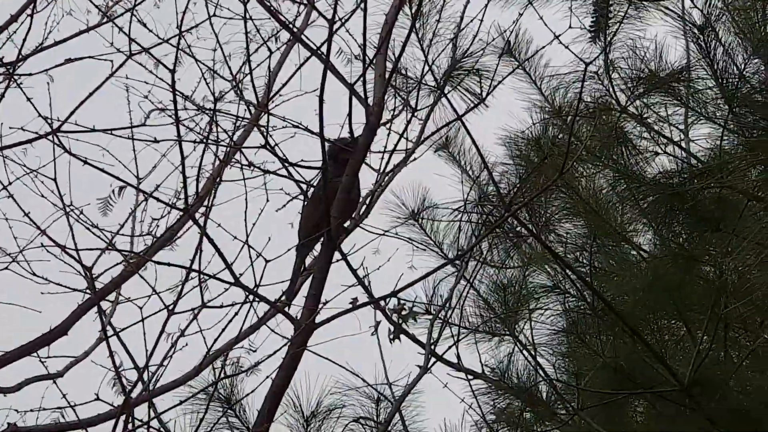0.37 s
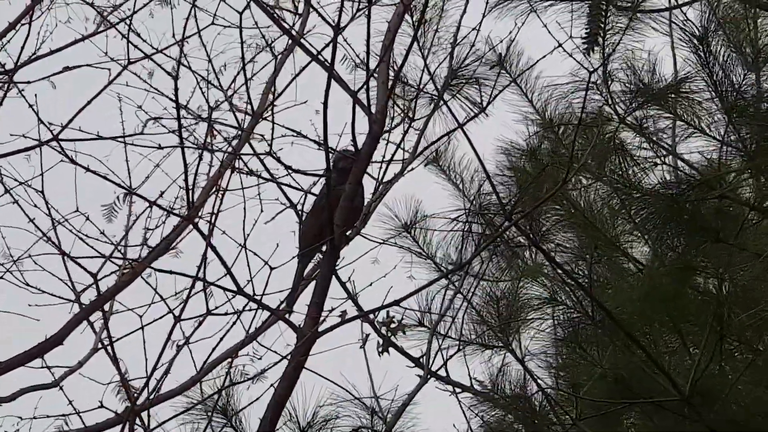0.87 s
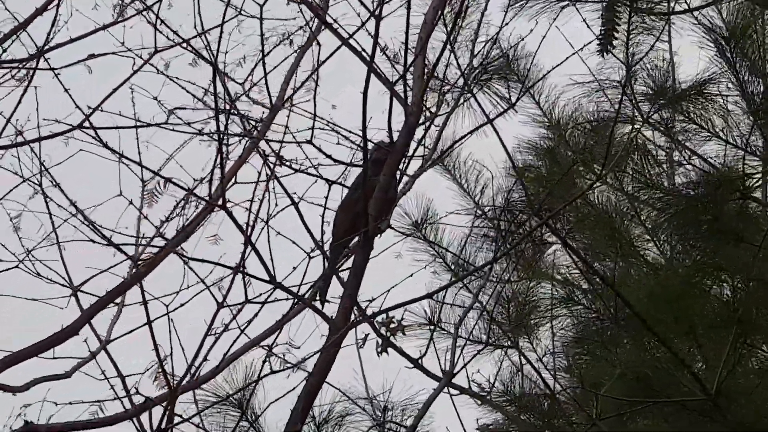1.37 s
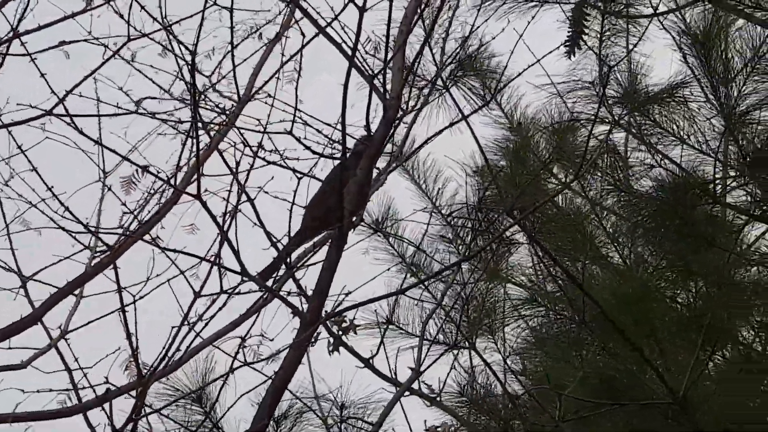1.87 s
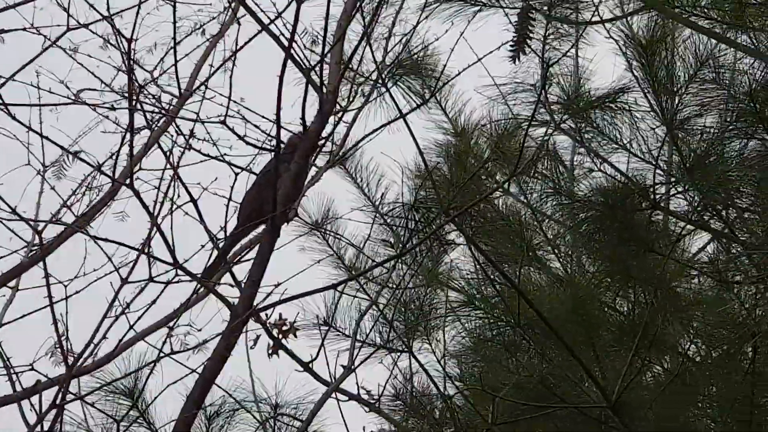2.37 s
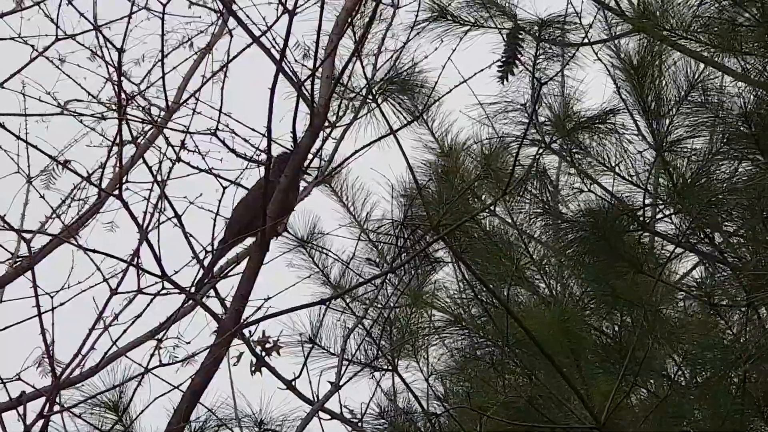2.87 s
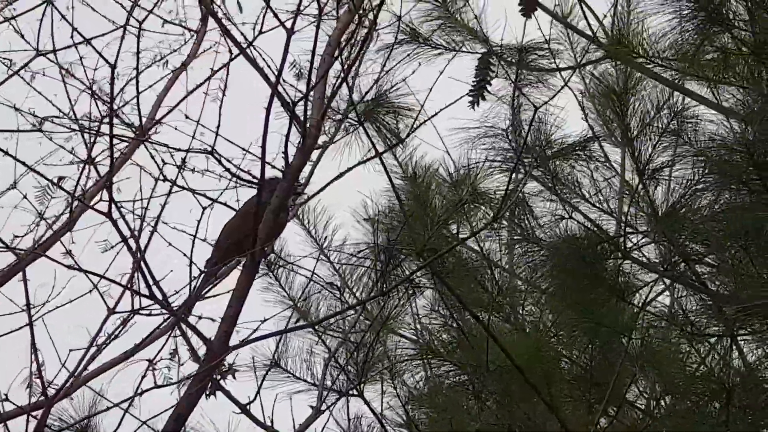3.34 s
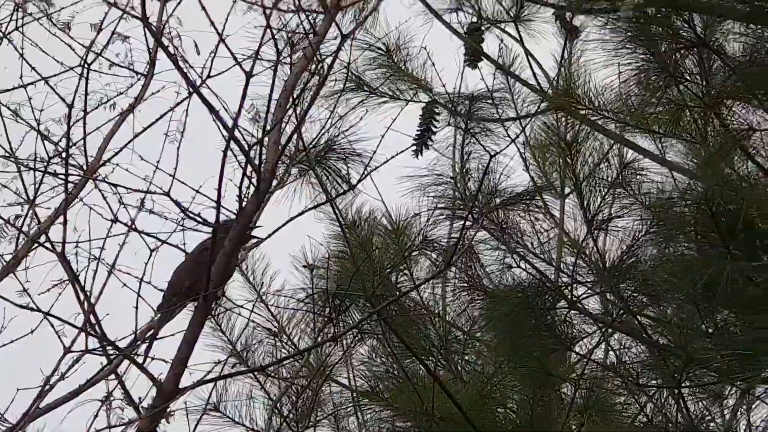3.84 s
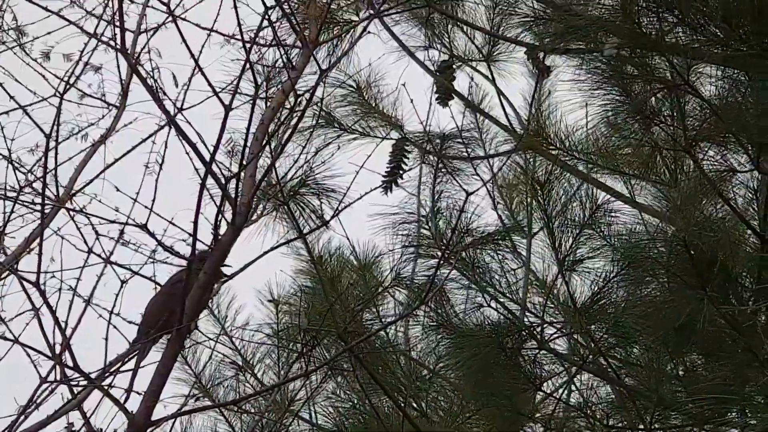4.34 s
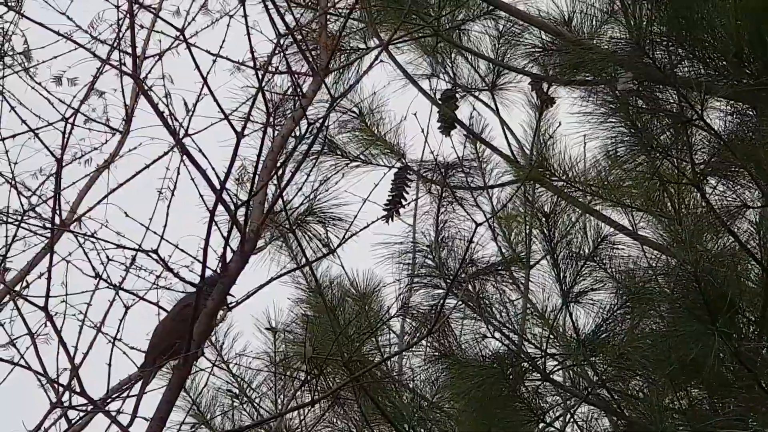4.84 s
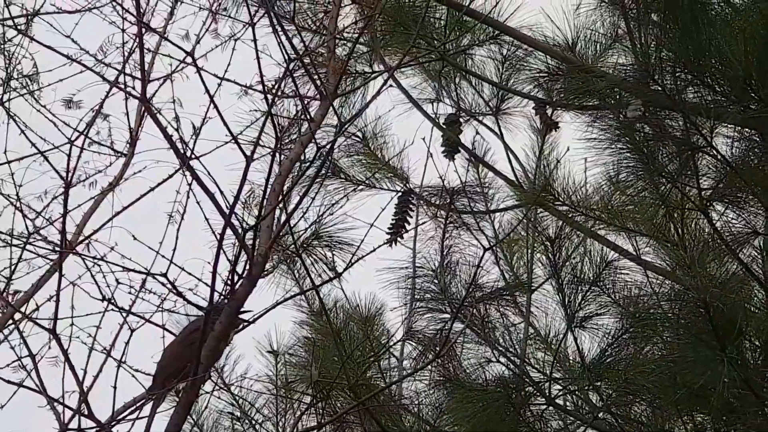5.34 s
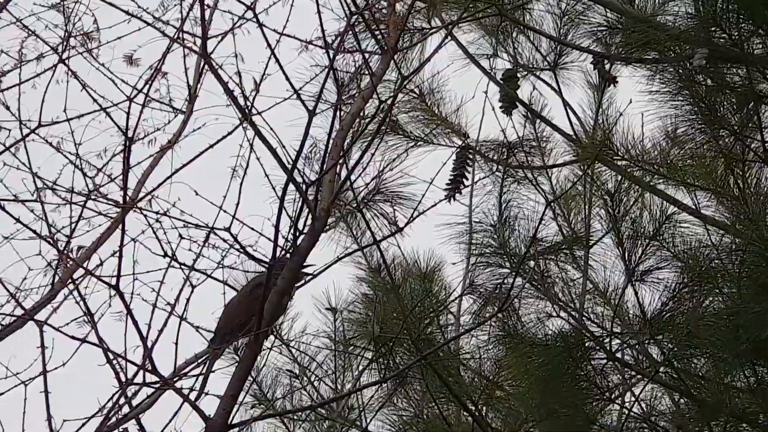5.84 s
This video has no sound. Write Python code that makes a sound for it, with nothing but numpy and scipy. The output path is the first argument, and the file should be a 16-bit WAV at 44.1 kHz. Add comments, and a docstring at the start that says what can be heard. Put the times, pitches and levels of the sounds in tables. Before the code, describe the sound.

Nasal, warbling bird calls dip and rise again, echoing lightly among trees, with small dry ticks between them and a distant low hum.

```python
"""A small bird in bare branches is heard mid-call at once: a nasal, swooping stack of jittered partials.
A faint rustle follows, then from 1.5 s fuller calls with brief hoarse rasps; trees echo and scatter them.
Noise-burst ticks, more rustling and faint sagging coos fill 2.5 to 3.2 s; calls return, with another coo
near 5.2 s, and the last call is still sounding at the end. Throughout, wavering low tones make a
machine-like rumble on the left under a thin outdoor hiss, with short faint bands of noise."""
import sys
import numpy as np
from scipy import signal
from scipy.fft import rfft, irfft
from scipy.io import wavfile
from scipy.ndimage import uniform_filter1d

SR = 44100
rng = np.random.default_rng(int(sys.argv[2]) if len(sys.argv) > 2 else 0)


def level_to_linear(level):
    """Convert decibel levels to linear amplitude factors, elementwise."""
    exponent = np.asarray(level, float) / 20
    return 10 ** exponent


def waveform_to_disk(signal):
    """Save audio, clipped to [-1, 1], as 16-bit WAV at the path in sys.argv[1]."""
    frames = np.transpose(np.atleast_2d(signal))
    scaled = np.clip(frames, -1, 1) * 32767
    samples = np.round(scaled).astype(np.int16)
    wavfile.write(sys.argv[1], SR, samples)


N = 262836

# the song, one list per call: (time [s], pitch [Hz], effort [dB])
CALLS = [
    [(0.001, 1854, 9), (0.018, 1751, 5.5), (0.05, 1279, 1.5), (0.075, 1221, -0.5), (0.095, 1338, 2),
     (0.135, 1590, 2.5), (0.167, 1701, 2.5)],
    [(1.54, 2129, -10), (1.555, 2140, -6.5), (1.59, 1850, -1), (1.62, 1790, -2), (1.665, 2000, 0.5),
     (1.705, 2110, 0.5), (1.775, 2160, 2), (1.855, 2000, 5.5), (1.915, 1290, -0.5), (1.95, 1500, -0.5),
     (2.0, 1869, 5), (2.045, 2050, 1.5), (2.06, 2090, 2.5), (2.155, 2250, 0), (2.24, 2110, 4),
     (2.275, 1920, 6.5), (2.325, 1205, -1.5), (2.375, 1406, 4), (2.41, 1520, 3.5), (2.438, 1690, 3)],
    [(3.455, 2030, -17), (3.47, 2048, -12.5), (3.52, 1949, -8), (3.655, 2165, -3), (3.71, 2160, -4.5),
     (3.765, 1972, 2), (3.833, 1260, -2), (3.87, 1487, 0.5), (3.95, 1971, 2.5), (4.01, 2130, 3),
     (4.06, 2225, -4.5), (4.095, 2270, 0.5), (4.14, 2255, 1), (4.19, 2115, 3.5), (4.268, 1240, -1),
     (4.31, 1440, -1), (4.365, 1735, 1), (4.385, 1850, 6.5), (4.403, 1900, -0.5)],
    [(4.705, 2098, -14), (4.73, 2274, -6.5), (4.795, 2360, -8.5), (4.87, 2385, -11.5), (4.93, 2382, -9),
     (5.04, 2400, -9), (5.09, 2365, -8.5), (5.135, 2117, -1.5), (5.2, 2040, -2), (5.245, 1783, 2),
     (5.287, 1217, -4.5), (5.335, 1510, -3), (5.36, 1561, -2), (5.4, 1756, 5.5), (5.435, 1854, 8.5),
     (5.48, 1999, 3), (5.52, 1982, 3.5)],
    [(5.875, 1922, -11), (5.92, 1993, -2.5), (5.945, 2036, -5.5), (5.955, 2032, -6)],
]
# soft start of each call: (length [s], pitch ratio, starting level [dB])
CALL_OPENING = (.02, .86, -19)
# quick fall in pitch that ends each call: (length [s], pitch ratio, fade [dB])
CALL_CLOSING = (.023, 0.47, -14.5)
# warble of each call, as pull on the pitch:
# (opening depth [share], opening decay [s], closing depth [share], rate [tugs per s])
CALL_WARBLE = [(0.015, .05, .11, 68), (.05, .06, 0.086, 75), (.05, 0.081, 0.04, 69), (.19, .17, 0.028, 108),
               (.04, .04, .005, 140)]
WARBLE_REST, WARBLE_GROWS_S = 0.0059, 0.097   # depth always present [share]; time scale of its closing growth
# hoarse patches with half-pitch rasp: (start [s], length [s], level against the voice [dB])
RASP_PATCHES = [(1.506, 0.033, -10.5), (1.708, 0.04, -20), (1.78, 0.008, -22), (1.818, 0.0099, -23.5),
                (2.14, 0.023, -24), (3.427, 0.024, -1.5), (3.634, 0.035, -17), (4.032, 0.059, -17.5),
                (4.673, 0.027, -6), (4.961, 0.14, -17.5), (5.851, 0.032, -11)]
RASP_ROOT_DB = 4   # most that a rasp lifts the lowest partial
# source strength of partials 1 to 12: (level [dB])
PARTIAL_LEVELS = [-2.5, 2.79, -5, -1, -1, -0.5, -1, -3.5, -4.5, -8, -20, 7]
# colour of throat and beak on every partial: (frequency [Hz], level [dB])
THROAT_COLOUR = [(1240, -72.5), (1900, -59.5), (2280, -39), (2500, -43), (3500, -36.5), (4200, -27),
                 (4750, -27), (5450, -27.5), (5900, -28), (6330, -38), (6750, -31), (7200, -38),
                 (7750, -50.5), (8400, -40.5), (9500, -52), (11200, -35), (13000, -43), (15500, -48.5)]
# opening of the beak: (time [s], gain of partials 3 and 4 [dB], gain of those above [dB])
BEAK_OPENING = [(0, -3.5, -2.5), (.17, -3.5, -5.5), (1.55, 4.5, -0.2), (1.77, -1, 2), (2.1, 2, 3),
                (2.44, -3, -1), (3.5, 8, 0.8), (3.7, 3.5, 2.5), (3.95, -0.5, -0.8), (4.1, -1.5, -11.5),
                (4.25, -0.5, 1), (4.4, -2.5, -6), (4.72, 4, -5.5), (4.87, 8.5, -13), (5.03, 8, -5.5),
                (5.13, -5, -4.5), (5.3, -0.5, 1.5), (5.4, -5.5, -5.3), (5.47, -17.5, -4.8),
                (5.53, -8, -2.5), (5.87, 3, -4.5)]
SLACK_FROM_HZ, SLACK_FULL_HZ, SLACK_ODD_DB = 1770, 1150, -10.5   # low notes weaken the odd partials
JITTER, FLICKER_DB = .0045, 1.2   # basic pitch jitter [share]; level flicker of partials 1 to 4
# stereo tilt of the near sounds: (frequency [Hz], left-right difference [dB])
NEAR_BALANCE = [(1300, -0.5), (2400, -11), (4400, -10), (6400, -12.5), (8200, 6), (9800, 4), (11500, -16),
                (15000, -19)]
# the bird turns its head; the other near sounds share this tilt: (time [s], left-right difference [dB])
HEAD_TURN = [(0, 2), (1.7, 4.5), (2.2, 2.5), (3.6, 2), (4.2, 0.5), (4.9, -2), (5.3, 0), (5.9, 1.5)]

# dry ticks: (time [s], level before colouring [dB])
TICK_HITS = [(2.6164, -42.5), (2.716, -44.5), (2.7676, -44), (2.797, -33.5), (2.849, -42), (2.9107, -58),
             (2.9724, -53), (3.0443, -30.5)]
# spectrum of ticks and rustling: (frequency [Hz], level [dB])
TICK_SPECTRUM = [(2000, -35), (3800, -10), (5450, -12), (6900, -8.5), (8000, -20), (10500, -11.5),
                 (13100, -8.5), (15800, -1.5)]
# swells of soft rustling: (start [s], length [s], level [dB])
RUSTLE_SWELLS = [(0.412, 0.097, -63), (2.517, .72, -62)]

# single echoes: (left delay [s], left level [dB], right level [dB])
TREE_ECHOES = [(.0033, -20, -22), (.0081, -18, -20), (.0146, -21, -21)]
# scattered clouds: (T60 [s], build-up [s], level [dB], band from [Hz], band to [Hz])
TREE_SCATTER = [(0.09, 0.00081, -7.5, 410, 14100), (0.94, 0.01, -28.5, 2700, 5800),
                (0.47, 0.027, -25, 6200, 10100)]
# opening of the first call, still ringing in the trees: (level [dB], T60 [s], band from [Hz], band to [Hz])
LINGERING_WASH = (-47, 1.35, 2601, 6803)

# far coos that sag in pitch: (start [s], length [s], from [Hz], to [Hz], level [dB])
FAR_COOS = [(2.477, 0.37, 720, 659, -71), (2.822, 0.26, 975, 934, -68.5), (5.163, 0.29, 700, 655, -66.5)]

HUM_HZ, DRONE_HZ = 59, 95.5
# tones of the hum: (multiple of the lowest, waver rate [Hz], relative level [dB])
HUM_TONES = [(1, 3, 0.1), (1.36, 5, -10), (2, 2.5, -4), (4, 5, -18)]
# tones of the drone: (multiple of the lowest, waver rate [Hz], relative level [dB])
DRONE_TONES = [(1, 3, 0.1), (2, 3, -15)]
# rise and fall of the hum: (time [s], relative level [dB])
HUM_SWELL = [(0, -55.5), (1.1, -53), (2.9, -60.5), (3.25, -66.5), (3.502, -53.5), (5.96, -53)]
# rise and fall of the drone: (time [s], relative level [dB])
DRONE_SWELL = [(0, -48), (.5, -57), (1.2, -48.5), (2.298, -57.5), (3.05, -51), (3.3, -57), (3.6, -51.5),
               (4.6, -63.5), (5.96, -64.5)]
STEADY, WANDER = 3.2, .015   # steady part of a tone against its waver; share by which the speed wanders
RUMBLE_LEFT_DB = 18.5   # left above right

# spectrum of the outdoor hiss: (frequency [Hz], level [dB])
AIR_SPECTRUM = [(18, -36), (30, -10.5), (98, -12.5), (145, -20), (189, -22), (415, -28.5), (449, -28),
                (540, -26), (1590, -32), (2480, -34), (2830, -37.5), (6720, -41.5), (8300, -72.5),
                (16000, -62.5)]
# hiss level above the bass: (time [s], level [dB])
AIR_SWELL = [(0, -60.5), (1.4, -61), (2.6, -58.5), (3.3, -63), (4.6, -60.5), (5.96, -63)]
# stereo tilt of the hiss: (frequency [Hz], left-right difference [dB])
AIR_TILT = [(60, 11), (110, 25), (200, 16.5), (380, 2), (700, 1), (1290, -2), (2380, -7), (4400, -12),
            (8120, -11), (15000, -5.5)]
# how alike the channels of the hiss are: (frequency [Hz], likeness [-1 to 1])
AIR_ALIKE = [(60, .97), (140, .92), (300, .4), (700, .1), (15000, 0)]
# faint noise bands that come and go: (start [s], length [s], centre [Hz], width [Hz], level [dB])
FAINT_BANDS = [(1.47, 0.068, 500, 610, -55), (2.777, 0.44, 849, 300, -65), (2.828, 0.2, 2800, 1300, -57.5),
               (3.12, 0.074, 4000, 151, -68), (4.1, 0.63, 450, 120.5, -66.5),
               (0.467, 0.031, 3800, 1200, -55)]
MIC_HISS_DB = -76.5   # before the differencing that tilts it to treble


def rms_one(x):
    """Scale to rms 1."""
    return x / np.sqrt(np.mean(x ** 2) + 1e-20)


def in_time(rows):
    """Columns of a table after its time, one value per sample."""
    s, *columns = np.transpose(rows)
    return [np.interp(np.arange(N) / SR, s, c) for c in columns]


def at_hz(points, hz):
    """Read a spectrum on a log-frequency axis."""
    table_hz, level_db = np.transpose(points)
    return np.interp(np.log(hz + 1), np.log(table_hz + 1), level_db)


def drift(rate_hz):
    """Slow chance: noise twice through a one-pole low-pass, scaled to rms 1."""
    r = np.exp(-2 * np.pi * rate_hz / SR)
    # the first second lets the filter settle
    return rms_one(signal.lfilter([1], [1, -2 * r, r * r], rng.standard_normal(N + SR))[SR:])


def shape(x, points):
    """Colour a sound by a spectrum."""
    return irfft(rfft(x) * level_to_linear(at_hz(points, np.fft.rfftfreq(N, 1 / SR))), N)


def spread(x, balance, lag=0):
    """Two channels whose level difference depends on frequency; the right one lags by some samples."""
    hz = np.fft.rfftfreq(N, 1 / SR)
    lean = level_to_linear(at_hz(balance, hz) / 2 * np.array([[1], [-1]]))
    late = np.exp(-2j * np.pi * hz * lag / SR * np.array([[0], [1]]))
    return irfft(rfft(x) * late * lean / np.mean(lean, axis=0), N)


def bird():
    """A jittered stack of partials coloured by the throat; warble tugs it down, rasps split it in half."""
    glide_hz, effort_db, warble, tugs_per_s = phrasing()
    hoarse = np.zeros(N)
    for start, length, level_db in RASP_PATCHES:
        hoarse[round(start * SR):round((start + length) * SR)] = level_to_linear(level_db)
    hoarse = uniform_filter1d(hoarse, size=90)

    # the warble drops the pitch sharply, then lets it climb back to its top
    saw = np.cumsum(tugs_per_s * (1 + .35 * drift(60.0)) / SR) % 1
    tug = uniform_filter1d((1 - saw) ** 3, size=80) - .12
    tug_db = -20.0 * warble * tug   # the voice weakens while it is pulled down

    low_note = np.clip((SLACK_FROM_HZ - glide_hz) / 300, 0, 1)
    shake = JITTER * (1 + .8 * low_note) * tremor(220.0)
    shake += 0.12 * np.minimum(hoarse, .3) * drift(500.0)
    pitch = glide_hz * (1 - warble * tug + shake)
    phase = 2 * np.pi * np.cumsum(pitch) / SR

    # low notes: slack membranes, blurred top
    slack = np.clip((SLACK_FROM_HZ - glide_hz) / (SLACK_FROM_HZ - SLACK_FULL_HZ), 0, 1)
    root_db = RASP_ROOT_DB * np.minimum(hoarse / 0.13, 1)
    middle_db, top_db = in_time(BEAK_OPENING)
    low, upper = np.zeros(N), np.zeros(N)
    for k, source_db in enumerate(PARTIAL_LEVELS, 1):
        level_db = effort_db + source_db + at_hz(THROAT_COLOUR, k * glide_hz)
        level_db = level_db + SLACK_ODD_DB * slack * (k % 2)
        level_db = level_db + (top_db if k > 4 else middle_db * (k > 2))
        if k < 5:
            level_db = level_db + root_db * (k == 1) + tug_db + FLICKER_DB * tremor(210.0)
            low += np.sqrt(2) * level_to_linear(level_db) * np.sin(k * phase + k)
        else:
            blur = (0.27 + 0.56 * slack + 4.0 * warble) * tremor(320.0)
            partial = np.sqrt(2) * level_to_linear(level_db + 1.5 * tremor(100.0)) * np.sin(k * phase + blur)
            upper += (k * pitch < .42 * SR) * partial   # silent near the Nyquist limit

    # alternate cycles differ unsteadily: smeared lines half-way between the partials
    uneven = np.cos(phase / 2) * drift(170.0)
    uneven += 0.67 * drift(1200.0) * level_to_linear(6.8 * drift(120.0) - 3.0)
    band = signal.butter(3, [2600, 7000], "band", fs=SR, output="sos")
    rasp = signal.sosfilt(band, low * uneven * hoarse)
    return low + upper * (1 + 2.5 * uneven * hoarse) + rasp


def phrasing():
    """Pitch, effort and warble: each call opens softly, follows its table and closes with a fall."""
    t = np.arange(N) / SR
    pitch, effort_db = np.full(N, 2000.), np.full(N, -120.)
    warble, tugs_per_s = np.zeros(N), np.full(N, 80.)
    open_s, open_ratio, open_db = CALL_OPENING
    close_s, close_ratio, close_db = CALL_CLOSING
    for call, (opening, dying_s, closing, rate) in zip(CALLS, CALL_WARBLE):
        s, hz, db = np.transpose(sorted(call))
        on = (t > s[0] - open_s) & (t < s[-1] + close_s)
        now = t[on]
        before = np.clip((s[0] - now) / open_s, 0, 1)
        after = np.clip((now - s[-1]) / close_s, 0, 1)
        pitch[on] = glide(s, hz, now) * open_ratio ** before * close_ratio ** after
        effort_db[on] = np.interp(now, s, db) + open_db * before + close_db * after
        since, until = np.maximum(now - s[0], 0), np.maximum(s[-1] - now, 0)
        early = opening * (1 - before) * np.exp(-(since / dying_s) ** 2)
        late = closing * np.exp(-(until / WARBLE_GROWS_S) ** 2)
        warble[on] = WARBLE_REST + early + late
        tugs_per_s[on] = rate
    return pitch, uniform_filter1d(effort_db, size=120), np.clip(warble, 0, .3), tugs_per_s


def glide(s, hz, t):
    """A smooth curve through the points that turns round at each top and bottom."""
    slope = np.diff(hz) / np.diff(s)
    a, b = slope[:-1], slope[1:]
    # harmonic mean of neighbouring slopes, flat where they change sign
    inner = np.where(a * b > 0, 2 * a * b / (a + b + 1e-9), 0)
    knot = np.r_[slope[0], inner, slope[-1]]
    k = np.clip(np.searchsorted(s, t) - 1, 0, len(s) - 2)
    step = np.diff(s)[k]
    u = np.clip((t - s[k]) / step, 0, 1)
    straight = hz[k] + (hz[k + 1] - hz[k]) * u
    bend = (knot[k] - slope[k]) * (1 - u) - (knot[k + 1] - slope[k]) * u
    return straight + step * u * (1 - u) * bend


def tremor(rate_hz):
    """Muscle unsteadiness: slow chance with its fastest part smoothed away."""
    return rms_one(uniform_filter1d(uniform_filter1d(drift(rate_hz), size=80), size=55))


def ticks():
    """Dry ticks from the perch: noise with a fast-dying snap and a short fizz."""
    out, t = np.zeros(N), np.arange(2600) / SR
    decay = np.exp(-t / 0.0016) + 0.31 * np.exp(-t / 0.028)
    for s, level_db in TICK_HITS:
        at = round(s * SR)
        out[at:at + len(t)] += level_to_linear(level_db) * rng.standard_normal(len(t)) * decay
    return shape(out, TICK_SPECTRUM)


def rustle():
    """Patchy bright noise of leaves or feathers, in swells."""
    swell = np.zeros(N)
    for start, length, level_db in RUSTLE_SWELLS:
        at, count = round(start * SR), round(length * SR)
        swell[at:at + count] = level_to_linear(level_db) * np.sqrt(np.hanning(count))
    noise = rms_one(shape(rng.standard_normal(N), TICK_SPECTRUM))
    return swell * level_to_linear(4.0 * drift(25.0)) * noise


def trees(x):
    """A few single echoes and three dying clouds of scatter, different in each channel."""
    t = np.arange(SR) / SR
    reply = np.zeros((2, SR))
    for delay, left_db, right_db in TREE_ECHOES:
        reply[0, round(delay * SR)] += level_to_linear(left_db)
        reply[1, round(delay * SR * 1.03)] += level_to_linear(right_db)   # slightly longer path
    for t60, rise, level_db, low_hz, high_hz in TREE_SCATTER:
        cloud = rng.standard_normal((2, SR)) * level_to_linear(-60 * t / t60) * (1 - np.exp(-t / rise))
        cloud = signal.lfilter(*signal.butter(2, [low_hz, high_hz], "band", fs=SR), cloud)
        reply += level_to_linear(level_db) * cloud / np.sqrt(np.sum(cloud ** 2, axis=1, keepdims=True))
    return signal.fftconvolve(x, reply, axes=1)[:, :N]


def linger():
    """A dying wash of band-passed scatter, different in each channel and louder on the right."""
    level_db, t60, low_hz, high_hz = LINGERING_WASH
    band = signal.butter(2, [low_hz, high_hz], "band", fs=SR, output="sos")
    wash = rms_one(signal.sosfilt(band, rng.standard_normal((2, N))))
    return level_to_linear(level_db - 60 * np.arange(N) / SR / t60) * wash * level_to_linear([[-3.5], [3.5]])


def coos():
    """Soft, slightly unsteady sine tones from far off, sagging in pitch."""
    out = np.zeros(N)
    for start, length, from_hz, to_hz, level_db in FAR_COOS:
        at, count = round(start * SR), round(length * SR)
        hz = np.linspace(from_hz, to_hz, count) * (1 + 0.014 * drift(13.0)[:count])
        tone = np.sin(2 * np.pi * np.cumsum(hz) / SR)
        out[at:at + count] += np.sqrt(2 * np.hanning(count)) * level_to_linear(level_db) * tone
    return out


def rumble():
    """Two distant machines: narrow wavering tones of a hum and a drone, each swelling and fading."""
    out = np.zeros(N)
    machines = [(HUM_HZ, HUM_TONES, HUM_SWELL), (DRONE_HZ, DRONE_TONES, DRONE_SWELL)]
    for hz, tones, swell in machines:
        swell_db, = in_time(swell)
        turns = hz * np.cumsum(1 + WANDER * drift(.5)) / SR
        for multiple, waver_hz, level_db in tones:
            waver = drift(waver_hz) + 1j * drift(waver_hz) + STEADY
            tone = rms_one(np.real(waver * np.exp(2j * np.pi * multiple * turns)))
            out += level_to_linear(level_db + swell_db) * tone
    return 2 * out * level_to_linear(np.array([[-1], [-1 - RUMBLE_LEFT_DB]]))


def air():
    """Smooth far hiss, alike in both channels only in the bass; levelled by its part above the bass."""
    level_db, = in_time(AIR_SWELL)
    hz = np.fft.rfftfreq(N, 1 / SR)
    alike = np.clip(at_hz(AIR_ALIKE, hz), -1, 1)
    mid, side = rfft(rng.standard_normal((2, N)))
    pair = np.sqrt(1 + alike) * mid + np.sqrt(1 - alike) * side * [[1], [-1]]
    pair = spread(irfft(pair * level_to_linear(at_hz(AIR_SPECTRUM, hz)), N), AIR_TILT)
    above_bass = signal.sosfilt(signal.butter(2, 300, "high", fs=SR, output="sos"), pair.mean(axis=0))
    return level_to_linear(level_db) * pair / np.sqrt(np.mean(above_bass ** 2))


def faint():
    """Short narrow bands of noise that swell and fade: slow chance moved up to a centre pitch."""
    out = np.zeros((2, N))
    for start, length, hz, width, level_db in FAINT_BANDS:
        at, count = round(start * SR), round(length * SR)
        t = np.arange(count) / SR
        waver = (drift(width / 2) + 1j * drift(width / 2))[:count]
        band = np.real(waver * np.exp(2j * np.pi * hz * t))
        out[:, at:at + count] += level_to_linear(level_db) * np.sqrt(np.hanning(count)) * band
    return out


def scene():
    """Bird and perch sounds lean mostly right and ring in the trees; the background lies under them."""
    turn_db, = in_time(HEAD_TURN)
    near = spread(bird() + ticks() + rustle(), NEAR_BALANCE, lag=0.99)
    near = near * level_to_linear(turn_db / 2 * [[1], [-1]])
    return level_to_linear(4.5) * (near + trees(near)) + linger() + coos() + rumble() + air() + faint()


def roll_off(x):
    """The treble ends steeply here."""
    return signal.sosfilt(signal.butter(12, 16480, fs=SR, output="sos"), x)


def record(dry):
    """The microphone adds treble-tilted hiss and loses the deepest bass and the top."""
    hiss = level_to_linear(MIC_HISS_DB) * np.diff(rng.standard_normal((2, N + 1)))
    mix = signal.sosfilt(signal.butter(3, 42, "high", fs=SR, output="sos"), dry + hiss)
    mix = signal.sosfilt(signal.cheby2(14, 60, 16100, fs=SR, output="sos"), mix)
    return roll_off(mix)


dry = scene()
out = record(dry)
waveform_to_disk(out)
```